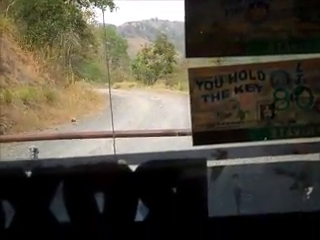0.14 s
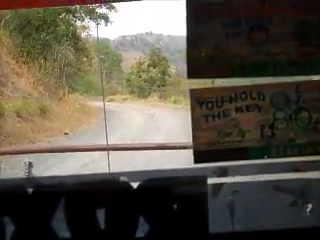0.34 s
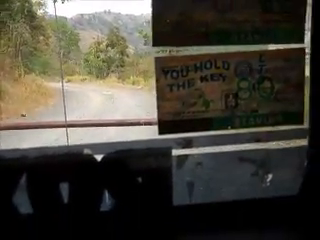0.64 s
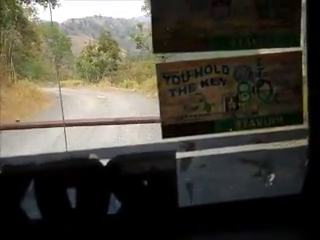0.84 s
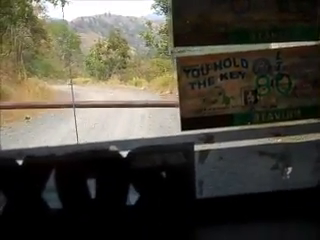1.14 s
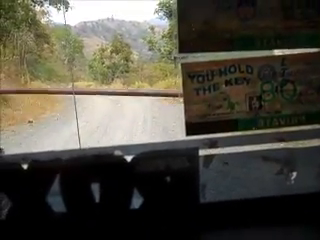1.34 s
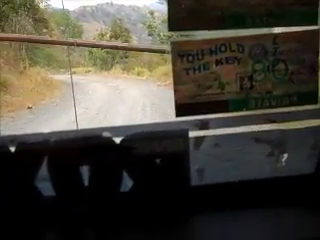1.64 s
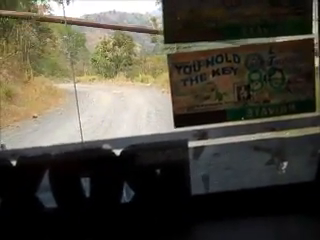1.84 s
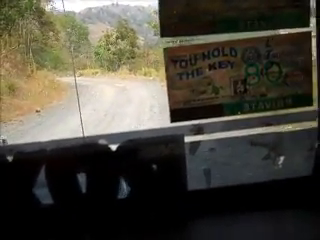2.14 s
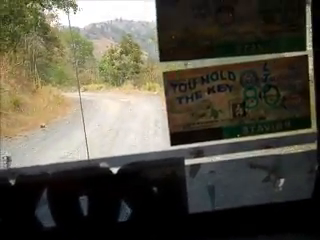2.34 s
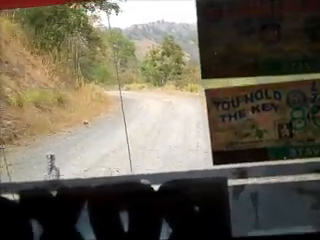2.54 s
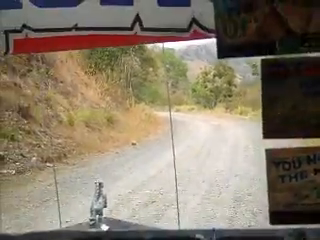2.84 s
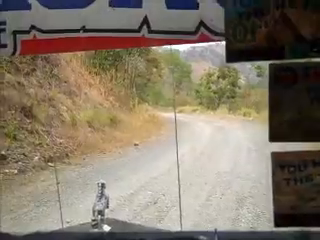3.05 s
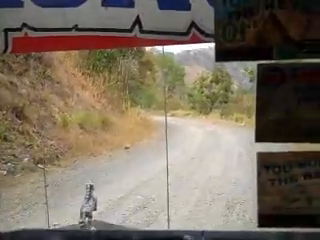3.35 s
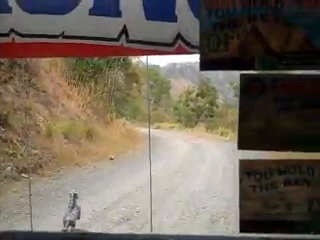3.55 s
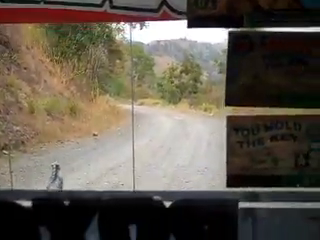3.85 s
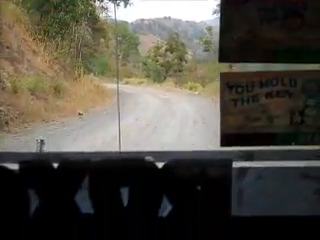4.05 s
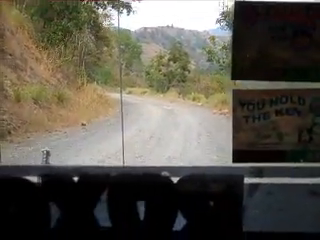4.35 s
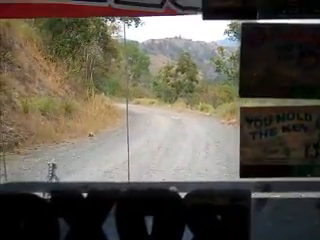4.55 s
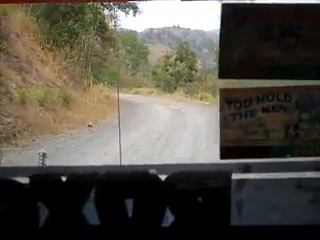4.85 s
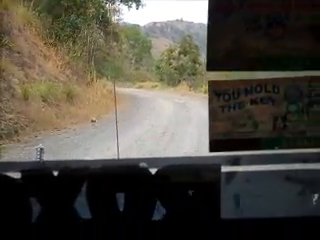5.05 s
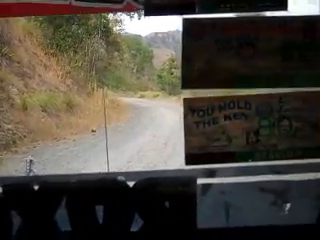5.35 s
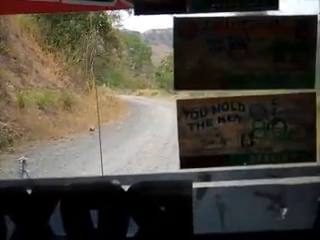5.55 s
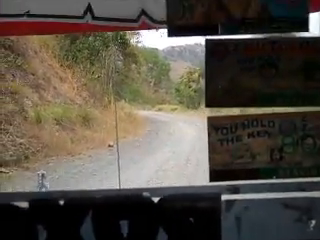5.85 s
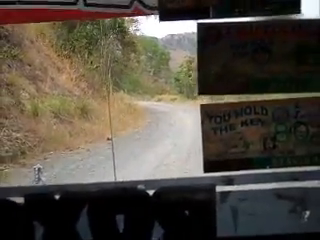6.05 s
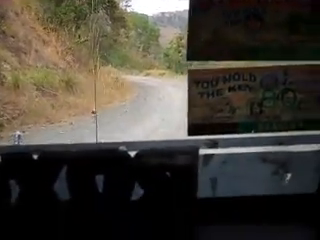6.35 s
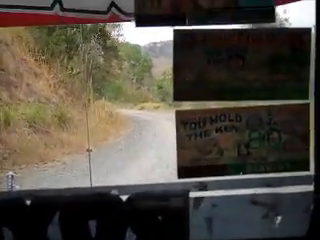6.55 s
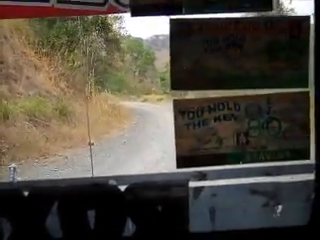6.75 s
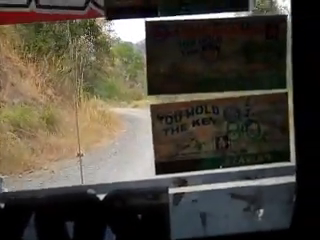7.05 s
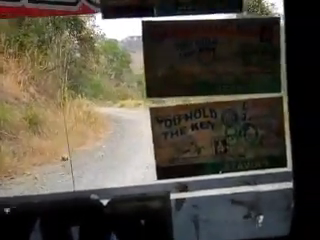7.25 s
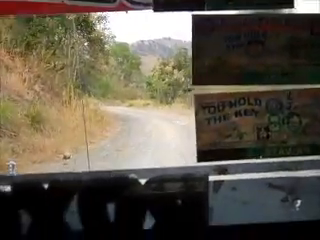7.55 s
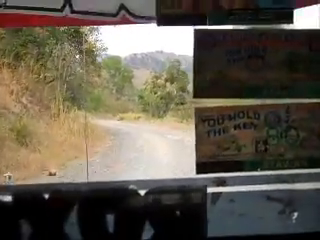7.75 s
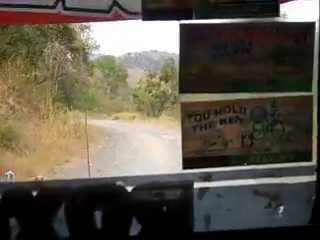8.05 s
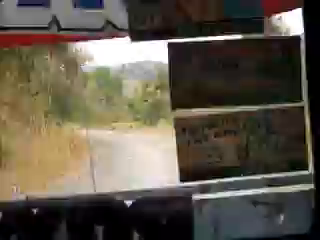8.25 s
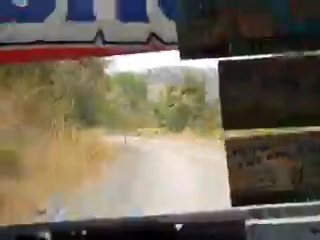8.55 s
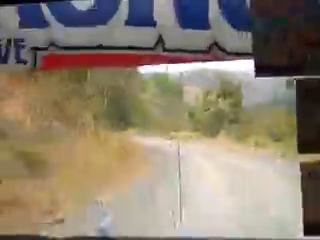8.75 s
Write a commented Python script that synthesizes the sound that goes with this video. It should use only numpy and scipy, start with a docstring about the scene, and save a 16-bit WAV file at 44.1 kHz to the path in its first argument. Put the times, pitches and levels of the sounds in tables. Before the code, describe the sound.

An old vehicle's engine drones in a booming, clattering cab over gravel hiss, sags into a bend, jolts, then revs up and pulls away.

```python
"""A droning engine, a clattering, booming body and tyres hissing on gravel: inside an old utility vehicle's cab.
On a mountain road the engine sags into a bend and pulls away again; it is a sum of waves tied to its turning.
Road and body are coloured noise, much of it shaken in time with the engine; whines, squeaks and groans are single notes.
Metal parts chink, grit swishes and jolts thump the microphone.
The harder jolts make the recorder's limiter duck everything for a moment."""
import sys
import numpy as np
from scipy import signal
from scipy.fft import rfft, irfft
from scipy.io import wavfile
from scipy.ndimage import uniform_filter1d, minimum_filter1d

SR = 44100
rng = np.random.default_rng(int(sys.argv[2]) if len(sys.argv) > 2 else 0)


def transcribe(signal):
    """Save signal, clipped to [-1, 1], as a 16-bit WAV file at the path in sys.argv[1]."""
    frames = np.atleast_2d(signal).T
    limited = np.clip(frames, -1, 1)
    pcm = np.round(limited * 32767).astype(np.int16)
    wavfile.write(sys.argv[1], SR, pcm)


N = 392490
TIME = np.arange(N) / SR  # seconds
BINS = np.fft.rfftfreq(N, 1 / SR)  # Hz

# how hard the chassis heaves over the ruts; only the changes matter: time_s, heave_db
HEAVE_OVER_TIME = [(0.0, -31), (1.5, -34), (3.3, -28), (4.5, -34), (5.6, -23.5), (6.15, -27.5), (6.9, -19),
                   (7.5, -26), (8.25, -26), (8.62, -18), (8.9, -21)]


def amp(db):
    """Turns decibels into gain."""
    return 10 ** (np.asarray(db) / 20)


def unit(x):
    """Scales a signal to an average (rms) strength of 1."""
    return x / np.sqrt(np.mean(x ** 2) + 1e-20)


def curves(table):
    """Joins the points of a time table: one curve over all samples for each column."""
    s, *columns = np.transpose(table)
    return [np.interp(TIME, s, column) for column in columns]


def over_bins(points):
    """Joins the points of a frequency table on a log axis."""
    hz, value = np.transpose(points)
    return np.interp(np.log(BINS + 1), np.log(hz + 1), value)


def wander(hz):
    """Random drifting of rms 1, up to about the given rate."""
    return unit(irfft(rfft(rng.standard_normal(N)) / (1 + (BINS / hz) ** 4), N))


def bell(centre_s, half_s):
    """A smooth swell that peaks at 1 and has dropped to about a third at half_s on either side."""
    return np.exp(-((TIME - centre_s) / half_s) ** 2)


def body_colour(spectrum):
    """Gain per frequency of a spectrum heard through the ringing sheet metal of the cab."""
    # resonances of the cab's panels: pitch_hz, width_hz, lift_db
    panels = [(430.6, 16, 5), (552, 33, 3), (630, 34, 1.5), (1215, 21, 2), (1583, 16, 6), (1770, 33, -1.5),
              (2070, 7.1, 5), (6540, 130, 0.5)]
    lift_db = sum(db / (1 + (2 * (BINS - hz) / width) ** 2) for hz, width, db in panels)
    treble_cut = 1 + (BINS / spectrum[-1][0]) ** 8  # starts at the last point of the spectrum
    return amp(over_bins(spectrum) + lift_db) / treble_cut


def noise(spectrum, drive=1):
    """Random rubbing and knocking of the given strength, coloured by the body and partly shared by both channels."""
    # likeness of the two channels: pitch_hz, likeness (0 to 1)
    likeness = [(60, 1), (130, 0.59), (280, 0.99), (560, 1), (1150, 0.57), (2200, 0.67), (2900, 1),
                (4600, 1), (6100, 1), (8000, 0.79)]
    common, apart = rfft(rng.standard_normal((2, N)) * drive)
    same = np.clip(over_bins(likeness), 0, 1)
    mid = common * np.sqrt(1 + same)
    side = apart * np.sqrt(1 - same)
    return unit(irfft(np.array([mid + side, mid - side]) * body_colour(spectrum), N))


def follow(law):
    """Gain of a layer that rises and falls with the road and the heave of the chassis."""
    # how hard the gravel works the tyres and body; only the changes matter: time_s, road_db
    road = [(0.0, -23.5), (0.15, -22.5), (0.26, -27), (0.38, -21.5), (2.0, -21.5), (2.9, -23.5),
            (3.55, -23), (4.0, -31), (4.35, -29), (4.75, -36), (5.3, -31), (5.65, -32), (6.2, -37.5),
            (6.5, -29.5), (7.0, -27), (7.95, -30), (8.35, -28), (8.58, -21.5), (8.9, -23.5)]
    mean_db, road_share, heave_share = law
    (road_db,), (heave_db,) = curves(road), curves(HEAVE_OVER_TIME)
    road_change_db = road_db - road_db.mean()
    heave_change_db = heave_db - heave_db.mean()
    return amp(mean_db + road_share * road_change_db + heave_share * heave_change_db)


def surge():
    """The ruts push the engine ahead or hold it back, by a drifting number of engine cycles."""
    # size at the strongest heave and fastest drift: cycles, rate_hz
    surge_settings = (.015, 3.5)
    cycles, rate_hz = surge_settings
    (heave_db,) = curves(HEAVE_OVER_TIME)
    return cycles * np.sqrt(amp(heave_db - heave_db.max())) * wander(rate_hz)


def engine_motion():
    """The engine holds, sags into the bend and pulls away; adding up its speed gives the cycles turned so far."""
    # engine speed before the ruts disturb it: time_s, speed_cycles_per_s
    speed_table = [(0.0, 28.93), (0.8, 28.7), (1.5, 28.83), (2.7, 28.38), (3.5, 29.2), (3.82, 25.29),
                   (4.2, 28.1), (4.58, 25.51), (5.0, 25.54), (5.48, 20.74), (5.7, 21.32), (6.0, 25.15),
                   (6.45, 29.98), (7.05, 33.95), (7.97, 42.0), (8.9, 50.46)]
    first_push_s = .0056
    (speed,) = curves(speed_table)
    turns = np.cumsum(speed) / SR - first_push_s * speed[0] + surge()
    return speed, turns


def cab_db(hz):
    """The air in the cab answers some notes more strongly than others, in dB."""
    # the cab's answer to a note: pitch_hz, level_db
    cab_response = [(42, -28), (52, -19), (57, -14.5), (62, -27), (71, -13.5), (83, -14), (92, -14.5),
                    (101, -17), (113, -21), (128, -28), (143, -23.5), (158, -36), (173, -29), (191, -28.5),
                    (216, -38), (230, -31), (244, -37), (259, -33.5), (290, -42.5), (320, -40.5),
                    (360, -53.5), (440, -44), (570, -42.5), (620, -45), (670, -39), (800, -61)]
    return np.interp(hz, *np.transpose(cab_response))


def order_levels(speed):
    """Waves at 2, 3 and 4 times the cycle rate swell and fade, in dB, as they glide across the cab's resonances."""
    # strength at the source, before the cab: time_s, second_db, third_db, fourth_db
    main_orders = [(0, .5, -12, -6), (1.9, .5, -9.5, -2.5), (2.35, -.7, -1.5, -7), (2.75, -2, -2.5, -11),
                   (3.0, -0.5, -17, -1.5), (3.45, 2, -16, -4), (3.7, 1.5, -3, -8), (5.0, 2, -2.5, -10),
                   (5.5, 3, -1, -6), (5.97, 2.5, -2, -13.5), (6.44, -7.5, -2, -1.5), (7.2, 1.5, -1, -5),
                   (7.6, 0, -17, -11), (8.0, 1.5, -5, -11), (8.57, -3.5, 0.5, -12), (8.9, -2, 4.5, -16)]
    return [db + cab_db(k * speed) for k, db in enumerate(curves(main_orders), 2)]


def engine(turns, speed, boom_db):
    """Low waves add up to one strong push a cycle; weaker ones hum between and above them and grow with the load."""
    # weaker waves at the source: multiple of the cycle rate, level_db
    overtones = [(2.75, -13), (3.25, -15), (4.5, -10), (5, -5), (5.5, -8), (6, -.5), (7, -7), (8, -10),
                 (8.5, -8), (9, -12), (11, -5), (12, -5), (13.5, -8)]
    load_share = 0.9  # dB of overtone growth per dB of cab boom
    load_db = load_share * (boom_db - boom_db[0])
    angle = 2 * np.pi * turns
    drone, weaker = 0, 0
    for k, db in enumerate(order_levels(speed), 2):
        drone += amp(db) * (1 + .06 * wander(12)) * np.cos(k * angle)
    for k, db in overtones:
        level_db = db + cab_db(k * speed) + 2 * wander(2)
        weaker += amp(level_db) * np.sin(k * angle + .25 * wander(4))
    return np.sqrt(2) * (drone + amp(load_db) * weaker)


def rocking(turns):
    """The engine rocks on its mounts once a cycle."""
    # how the rocking follows the drive: average_db, dB per dB of road, dB per dB of heave
    law = (-30, 0.2, 1)
    return follow(law) * unit(np.sin(2 * np.pi * turns))


def shaking(turns, cycle_db, firing_db, sway_db, grain_db, clump_db, sway_peak_s=0.8166):
    """Loose parts are kicked once a cycle and settle, shiver with firings, sway every fourth cycle and chatter in clumps."""
    angle = 2 * np.pi * turns
    kick = sum(np.sin(k * (angle + 1.5)) / k for k in range(1, 6))  # roughly a sawtooth
    beat_db = cycle_db * kick + firing_db * np.cos(3 * angle)
    sway = np.cos((angle - np.interp(sway_peak_s, TIME, angle)) / 4)
    chatter_db = grain_db * wander(600) + clump_db * wander(16.6)
    return amp(beat_db + sway_db * sway + chatter_db)


def lope(turns, spectrum, drive=1, count=200):
    """Uneven running in a pattern that returns every fourth cycle: close tones that glide with the engine."""
    pattern = irfft(np.r_[0, np.exp(2j * np.pi * rng.random(count))], 4096)
    pushes = np.interp(turns / 4 % 1, np.linspace(0, 1, len(pattern)), pattern)
    return unit(irfft(rfft(pushes * drive) * body_colour(spectrum), N))


def rumble():
    """The heaving chassis rumbles: deep noise that follows the ruts."""
    # shape of the sound: pitch_hz, level_db (per Hz, relative)
    spectrum = [(10, -26.5), (22, -3), (30, -5.5), (42, 4.5), (60, -4), (85, -7), (120, -11), (220, -48.5)]
    # how it follows the drive: average_db, dB per dB of road, dB per dB of heave
    law = (-25, -0.04, 0.99)
    return follow(law) * noise(spectrum)


def boom(turns, boom_db):
    """The cab booms: shaken low noise plus a part locked to the engine."""
    # shape of the sound: pitch_hz, level_db (per Hz, relative)
    spectrum = [(60, -13), (95, -2.5), (135, 2.5), (175, -5.5), (210, -9.5), (245, -11.5), (290, -18.5),
                (345, -25), (700, -75)]
    noise_db, lope_db = -10, -7.5  # on top of boom_db
    drive = shaking(turns, cycle_db=0.0, firing_db=2.5, sway_db=2.5, grain_db=2.5, clump_db=2.4)
    random_part = amp(noise_db) * noise(spectrum, drive)
    locked_part = amp(lope_db) * lope(turns, spectrum)
    return amp(boom_db) * (random_part + locked_part)


def roar(turns):
    """A mid-pitched roar, part noise and part locked to the engine, follows mostly the road."""
    # shape of the sound: pitch_hz, level_db (per Hz, relative)
    spectrum = [(200, -7), (350, -4.5), (440, -0.5), (540, -1), (610, -5), (690, 0), (860, -5.5),
                (1000, -3), (1250, -11.5), (2200, -36)]
    # how it follows the drive: average_db (before the other levels), dB per dB of road, dB per dB of heave
    law = (-33, 0.85, 0.082)
    # extra level, which eases when the throttle is lifted for the bend: time_s, level_db
    ease = [(0, 0.5), (2.7, -0.5), (3.2, -6), (3.6, -3), (4.2, -1.5), (5.5, -3), (5.9, 1), (6.6, 0.5),
            (7.5, -0.5), (8.9, -1)]
    noise_db, lope_db = -4, -2  # the two parts, before the levels above
    (ease_db,) = curves(ease)
    throb = shaking(turns, cycle_db=0.0, firing_db=-0.5, sway_db=0.2, grain_db=0.5, clump_db=1.17)
    random_part = amp(noise_db) * noise(spectrum, throb)
    locked_part = amp(lope_db) * lope(turns, spectrum, throb)
    return amp(ease_db) * follow(law) * (random_part + locked_part)


def clatter(turns):
    """Loose body parts clatter: noise in the middle range, kicked by the engine and worked by the road."""
    # shape of the sound: pitch_hz, level_db (per Hz, relative)
    spectrum = [(700, -20), (1100, -6), (1300, -2.5), (1580, -0.5), (1800, -0.5), (2080, -1.5),
                (2500, -5.5), (3000, -12), (5000, -22.5)]
    # how it follows the drive: average_db, dB per dB of road, dB per dB of heave
    law = (-34, 0.98, -0.025)
    drive = shaking(turns, cycle_db=1.15, firing_db=-0.4, sway_db=2.0, grain_db=0.8, clump_db=1.3)
    return follow(law) * noise(spectrum, drive)


def hiss(turns):
    """The tyres hiss on the gravel: bright noise that follows the road and pulses with the engine."""
    # shape of the sound: pitch_hz, level_db (per Hz, relative)
    spectrum = [(1200, -7), (2600, 1), (3400, -1.5), (4400, 0), (5300, -1.5), (6700, 2.5), (8000, -1),
                (8800, -4), (9300, -12.5), (10300, -15), (11300, -38.5)]
    # how it follows the drive: average_db, dB per dB of road, dB per dB of heave
    law = (-33, 0.91, 0.018)
    drive = shaking(turns, cycle_db=1.46, firing_db=0.0, sway_db=-0.42, grain_db=-0.64, clump_db=1.16)
    return follow(law) * noise(spectrum, drive)


def rattles(turns):
    """The shaking sets loose panels buzzing for a moment, each around its own resonance."""
    # one buzz a row: centre_s, half_length_s, pitch_hz, width_hz, level_db
    buzzes = [(1.0, 0.66, 2360, 700, -40), (1.918, 0.25, 2130, 500, -29), (3.45, 0.36, 920, 400, -35.5),
              (4.7, 0.54, 1690, 120, -51), (6.797, 0.86, 1610, 303, -42), (6.756, 0.9, 190, 55, -29.5),
              (8.657, 0.27, 1730, 900, -32)]
    drive = shaking(turns, cycle_db=1.0, firing_db=-1.0, sway_db=1.5, grain_db=3.5, clump_db=3.0)
    chatter = rfft(rng.standard_normal(N) * drive)
    out = np.zeros(N)
    for s, half_s, hz, width_hz, db in buzzes:
        resonance = 1 / (1 + (2 * (BINS - hz) / width_hz) ** 2)
        out += amp(db) * bell(s, half_s) * unit(irfft(chatter * resonance, N))
    return out


def singing():
    """Engine whines, humming panels and thin squeaks swell on one unsteady note and die away."""
    # one note a row: start_s, end_s, start_hz, end_hz, level_db, flutter_db
    notes = [(7.98, 8.33, 527, 522, -32.5, 2.5), (6.62, 6.8, 188, 194, -26, 2),
             (.68, .83, 495, 460, -35, 2), (2.02, 2.14, 528, 538, -35, 2), (.3, 1.95, 432, 432, -39, 2),
             (.3, 2.6, 663, 658, -46, 2), (1.48, 1.58, 7876, 7880, -33, 5),
             (1.55, 1.73, 7876, 7876, -37, 4), (1.7, 2.0, 7876, 7870, -48, 4),
             (1.42, 1.62, 4393, 4393, -44, 4), (1.2, 1.66, 5755, 5755, -46, 4),
             (1.19, 1.4, 8800, 8800, -39, 4), (1.48, 1.75, 8780, 8790, -41, 4)]
    out = np.zeros(N)
    for start, end, first_hz, last_hz, db, flutter_db in notes:
        along = np.clip((TIME - start) / (end - start), 0, 1)
        unsteady_hz = .11 * np.sqrt(first_hz) * wander(25)
        hz = first_hz + (last_hz - first_hz) * along + unsteady_hz
        flutter = unit(amp(flutter_db * wander(35)))
        swell = np.sqrt(abs(np.sin(np.pi * along))) * flutter
        out += amp(db) * swell * np.sqrt(2) * np.sin(2 * np.pi * np.cumsum(hz) / SR)
    return out


def sprays():
    """Grit thrown up by the tyres swishes along the body: short swells of bright noise."""
    # one swish a row: centre_s, half_length_s, level_db
    swishes = [(0.52, 0.13, -25.5), (3.455, 0.0048, -29), (3.587, 0.037, -33), (6.946, 0.033, -31.5),
               (7.476, 0.021, -30.5)]
    # shape of the sound: pitch_hz, level_db (per Hz, relative)
    spectrum = [(2000, -36), (4000, -6.5), (5500, -5.5), (6800, -0.5), (8300, -5), (9300, -8), (11000, -24)]
    swell = sum(amp(db) * bell(s, half_s) for s, half_s, db in swishes)
    return swell * noise(spectrum)


def chinks(size=4096):
    """The engine shakes a loose metal part: brief scrapes ring the part's own note and the metal around it."""
    # one chink a row: time_s, peak_db (before the trim), own_pitch_hz
    hits = [(0.6908, -23, 1970), (0.808, -19, 2000), (0.9444, -22, 2100), (1.0794, -20, 1740),
            (1.112, -24, 1630), (1.2466, -22, 1590), (1.328, -26, 2070), (1.385, -17, 1610),
            (1.4566, -17, 2100), (1.5244, -25, 2100), (1.5963, -20, 2150), (1.9425, -24, 1950),
            (2.8599, -22.5, 2440), (2.895, -21, 1840), (2.929, -20, 2100), (3.034, -18, 1900),
            (3.1735, -20.5, 2020), (3.203, -30, 2010), (3.276, -17, 2070), (3.3407, -21, 1980),
            (3.4133, -22, 2060), (3.481, -17, 2020), (3.5543, -17.5, 1980), (3.5917, -24, 1980),
            (3.7365, -25, 1910), (3.7742, -20, 2030), (3.9355, -25, 2060), (4.076, -26, 2020),
            (4.364, -33, 1660), (4.4438, -28, 2120), (4.6844, -27, 1660)]
    # what rings along with every chink: pitch_hz, width_hz, level_db (before ringing twice over)
    nearby_metal = [(1000, 150, -3), (1290, 150, -7.5), (1580, 130, -9), (2450, 800, -6)]
    own_width_hz, rise_s, trim_db = 160, 0.0048, 0.5
    out, hz = np.zeros(N + size), np.fft.rfftfreq(size, 1 / SR)
    age = np.arange(size) / SR / rise_s
    for s, db, own_hz in hits:
        modes = [(own_hz, own_width_hz, 0), *nearby_metal]
        ring = sum(amp(level) / (1 + 2j * (hz - f) / width) for f, width, level in modes)
        scrape = rfft(rng.standard_normal(size) * age * np.exp(-age))
        # the strength counts twice, the delay of the ringing once
        chink = irfft(scrape * abs(ring) ** 2 * np.exp(1j * np.angle(ring)), size)
        first = int((s - rise_s / 2) * SR)
        out[first:][:size] += amp(db + trim_db) * chink / abs(chink).max()
    return out[:N]


def groans():
    """The body swells on a low note with its octave, rasps once a swing late in the note, then lets go."""
    # one groan a row: start_s, end_s, start_hz, end_hz, level_db, rasp_db (before the once-a-swing pulsing)
    low_notes = [(2.9, 3.03, 117, 113, -14.5, -42), (5.17, 5.35, 142, 126, -20.5, -42),
                 (5.32, 5.75, 128, 119, -13, -32), (8.54, 8.74, 138, 148, -16, -40)]
    # shape of the rasp: pitch_hz, level_db (per Hz, relative)
    rasp_spectrum = [(280, 1), (450, -4.5), (740, 1.5), (930, 0.5), (1100, -12), (1500, -20)]
    octave_db = -27.5  # against the low note
    out, scrape = np.zeros((2, N)), noise(rasp_spectrum)
    for start, end, first_hz, last_hz, db, rasp_db in low_notes:
        along = np.clip((TIME - start) / (end - start), 0, 1)
        hz = first_hz + (last_hz - first_hz) * along + .5 * wander(25)
        angle = 2 * np.pi * np.cumsum(hz) / SR
        swell = abs(np.sin(np.pi * along ** 1.3)) ** .5
        note = np.sin(angle) + amp(octave_db) * np.sin(2 * angle)
        out += amp(db) * swell * np.sqrt(2) * note
        rasp_swell = np.sin(np.pi * along ** 6)  # comes late in the groan
        out += amp(rasp_db) * rasp_swell * (1 + np.cos(angle)) * scrape
    return out


def jolts():
    """Each bump in the road is one short, low throb of air against the microphone."""
    # one bump a row: time_s, peak_db (before the low cut and the limiter)
    bumps = [(2.97, -14), (3.793, -6), (4.108, 7.5), (5.021, 6.5), (5.313, 9.5), (5.692, 5), (7.224, 1),
             (7.363, 1), (7.634, 9)]
    half_s, throb_hz = .006, 78
    return sum(amp(db) * bell(s, half_s) * np.cos(2 * np.pi * throb_hz * (TIME - s)) for s, db in bumps)


def scene():
    """Engine, body and road, heard from the seat."""
    # level of the cab's boom, before its two parts are set: time_s, level_db
    boom_level = [(0.0, -15), (1.6, -17.5), (2.2, -14), (3.5, -16.5), (3.9, -23), (4.35, -21), (4.7, -24.5),
                  (5.3, -23), (5.6, -23), (5.95, -21), (6.2, -25), (7.0, -16), (7.5, -16.5), (8.1, -21.5),
                  (8.62, -13), (8.9, -12.5)]
    # left minus right: pitch_hz, difference_db
    left_right = [(40, -6), (70, -5.5), (130, -3), (300, 0.3), (1100, -2), (3400, 0), (6000, -0.47),
                  (9000, 2)]
    (boom_db,) = curves(boom_level)
    speed, turns = engine_motion()
    cab = engine(turns, speed, boom_db) + rocking(turns)
    cab = cab + rumble() + boom(turns, boom_db) + roar(turns)
    cab = cab + clatter(turns) + hiss(turns) + rattles(turns)
    cab = cab + singing() + sprays() + chinks() + groans() + jolts()
    low_cut = BINS ** 2 / (BINS ** 2 + 12 ** 2)  # thins out everything below about 12 Hz
    balance = amp(np.outer([.5, -.5], over_bins(left_right)))
    return irfft(rfft(cab) * low_cut * balance, N)


def record(dry, ceiling_db=-1.15, hold=0.089, recover_db_per_s=70):
    """A limiter drops the gain just ahead of an overload, holds it and lets it climb back; then clipping and a treble limit."""
    over_db = np.maximum(20 * np.log10(abs(dry).max(0) + 1e-9) - ceiling_db, 0)
    half = int(hold * SR / 2)
    # the window reaches 110 samples ahead, so the drop comes early
    held_db = -minimum_filter1d(-over_db, 2 * half + 1, origin=half - 110)
    climb_db = recover_db_per_s * TIME
    duck_db = np.maximum.accumulate(held_db + climb_db) - climb_db
    smooth_duck_db = uniform_filter1d(duck_db, size=130)
    limited = np.clip(dry * amp(-smooth_duck_db), -1, 1)
    treble_limit = signal.firwin(511, 11300, window=("kaiser", 9), fs=SR)  # edge at 11300 Hz
    return signal.oaconvolve(limited, treble_limit[None], "same")


dry = scene()
out = record(dry)
transcribe(out)
```